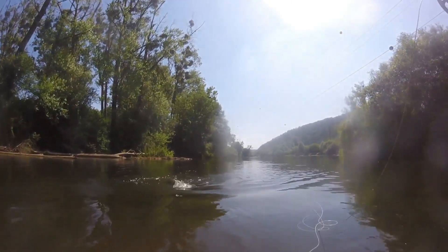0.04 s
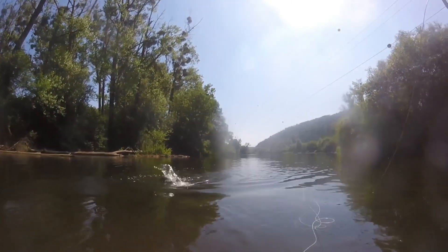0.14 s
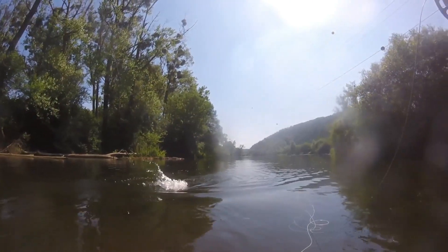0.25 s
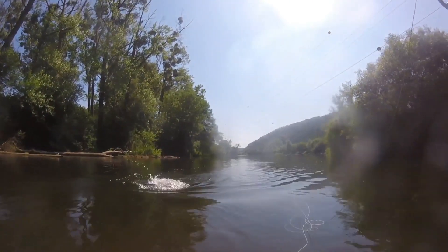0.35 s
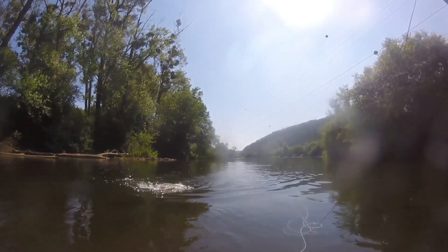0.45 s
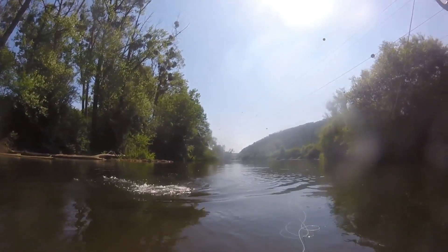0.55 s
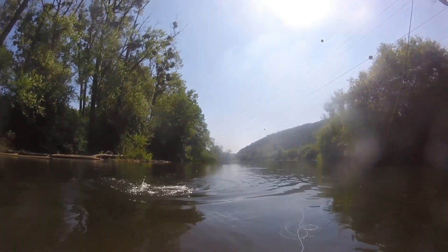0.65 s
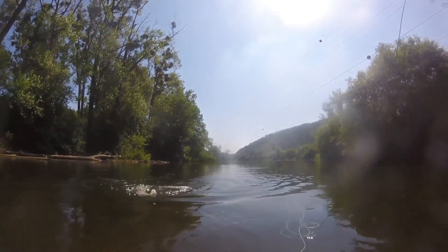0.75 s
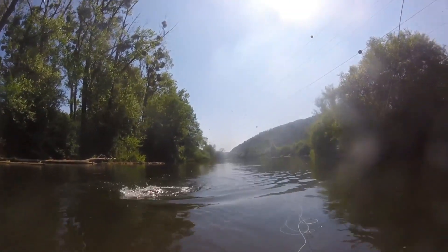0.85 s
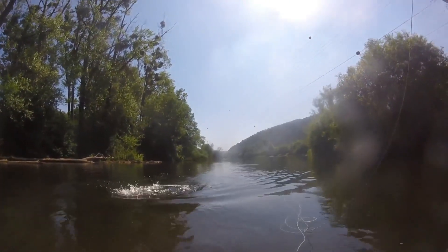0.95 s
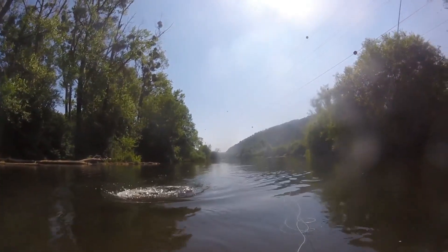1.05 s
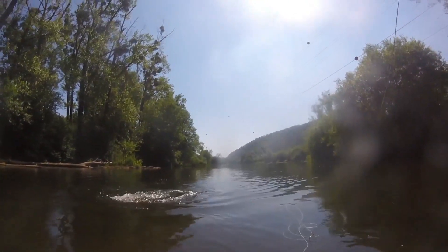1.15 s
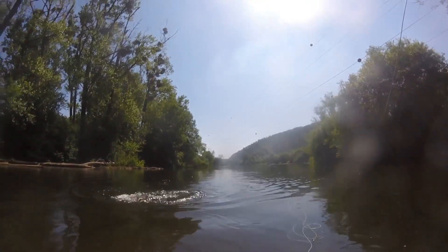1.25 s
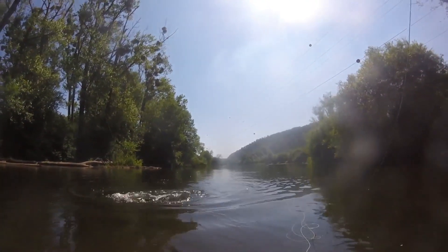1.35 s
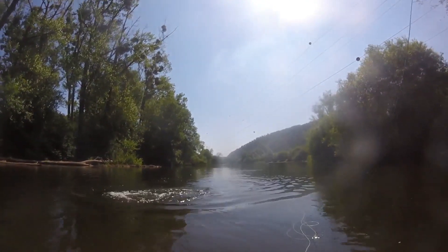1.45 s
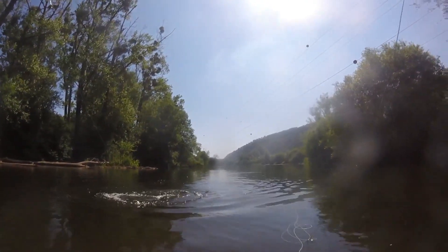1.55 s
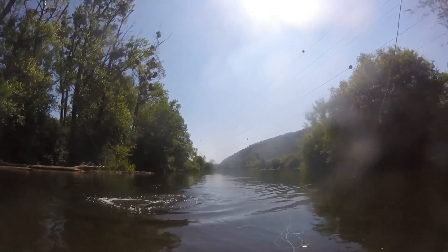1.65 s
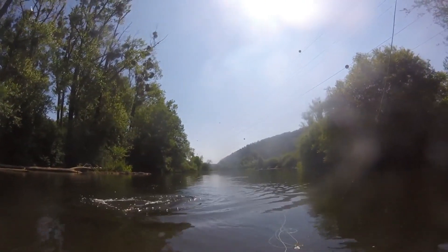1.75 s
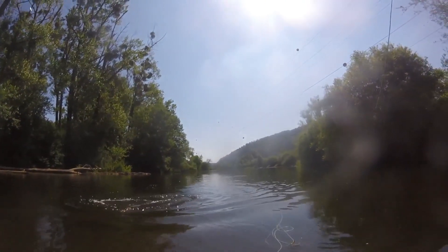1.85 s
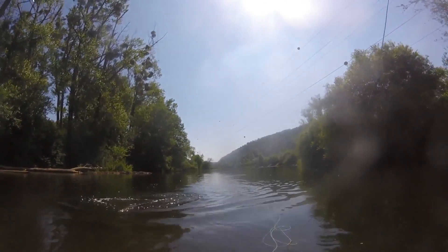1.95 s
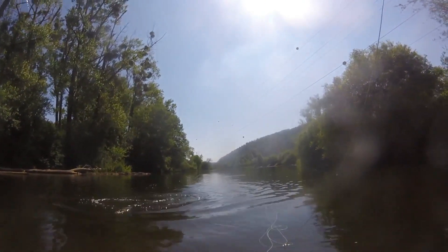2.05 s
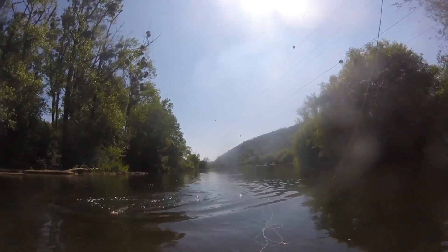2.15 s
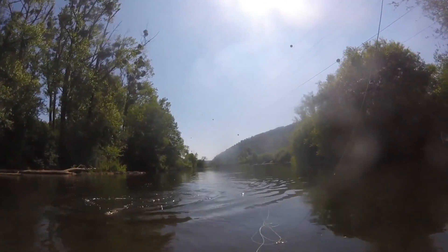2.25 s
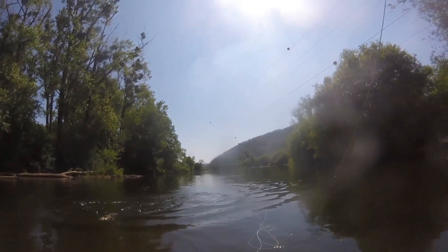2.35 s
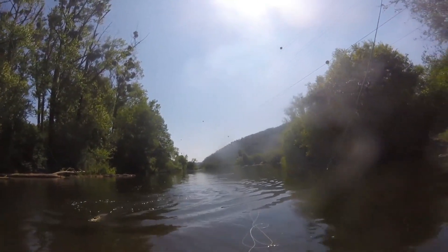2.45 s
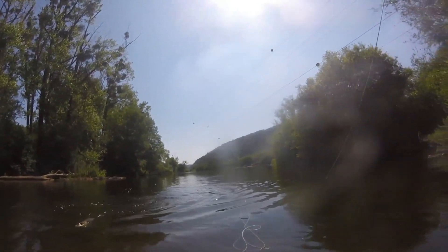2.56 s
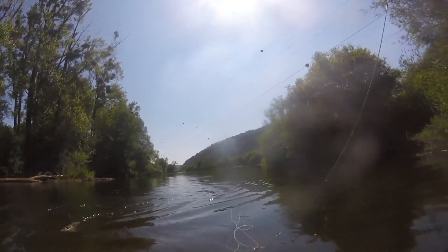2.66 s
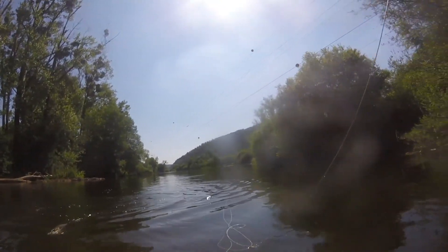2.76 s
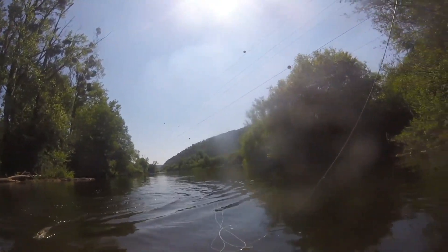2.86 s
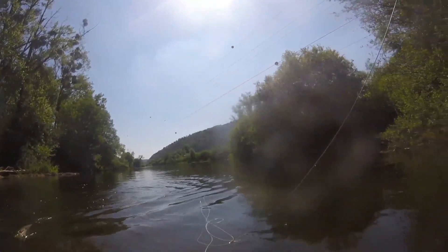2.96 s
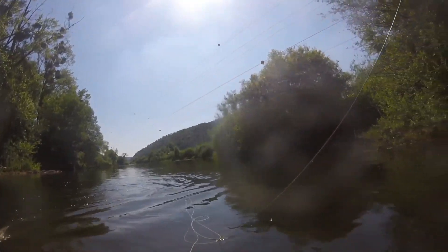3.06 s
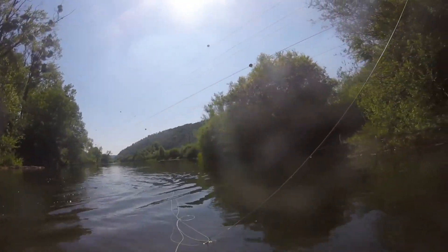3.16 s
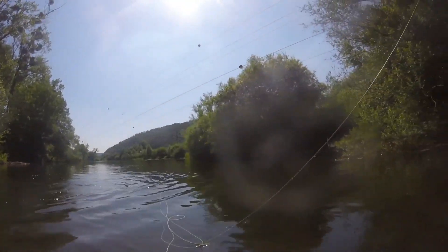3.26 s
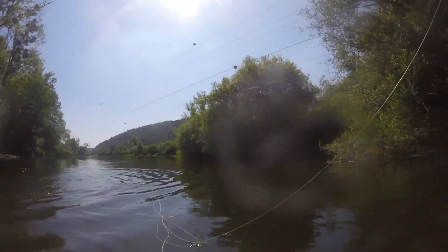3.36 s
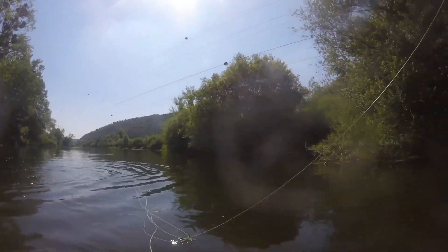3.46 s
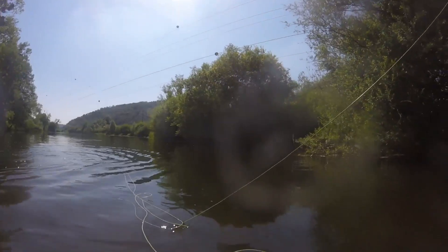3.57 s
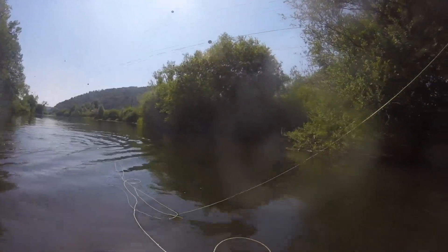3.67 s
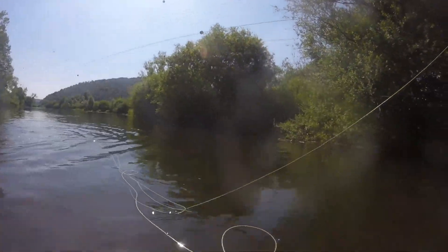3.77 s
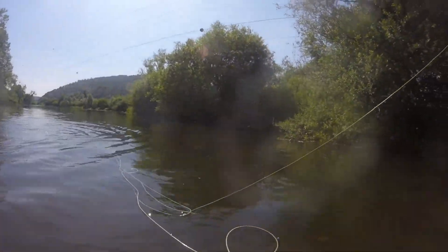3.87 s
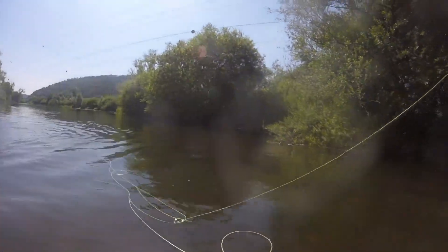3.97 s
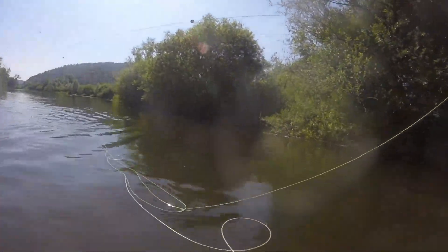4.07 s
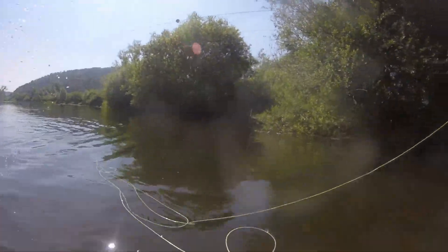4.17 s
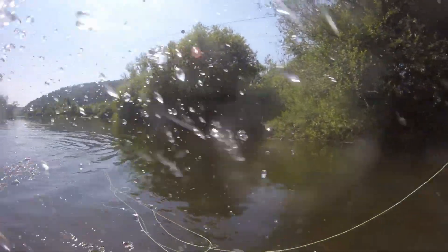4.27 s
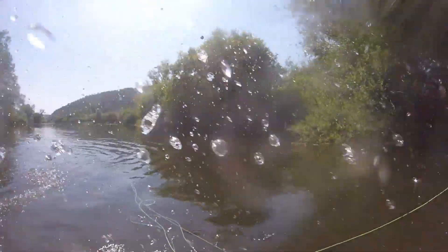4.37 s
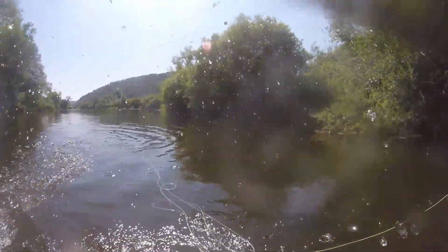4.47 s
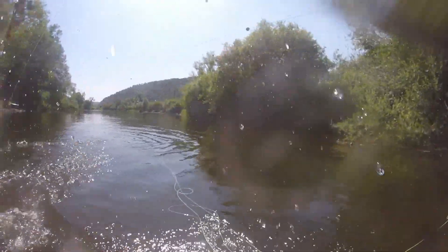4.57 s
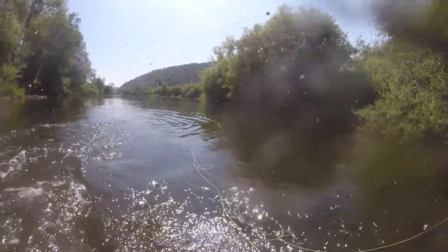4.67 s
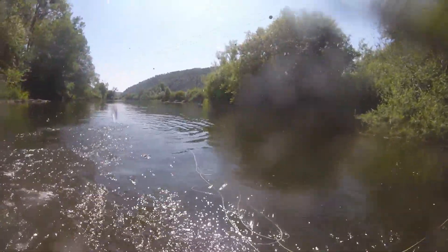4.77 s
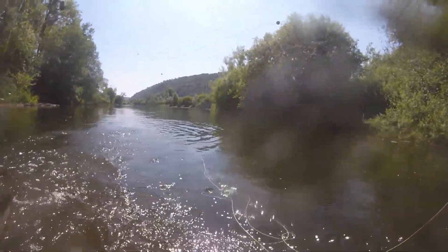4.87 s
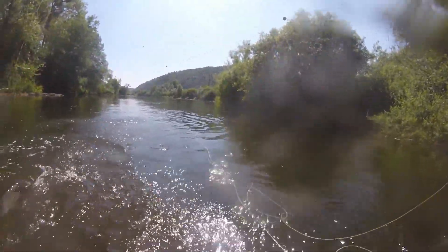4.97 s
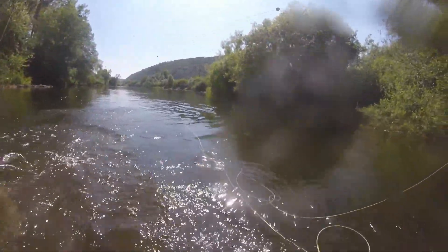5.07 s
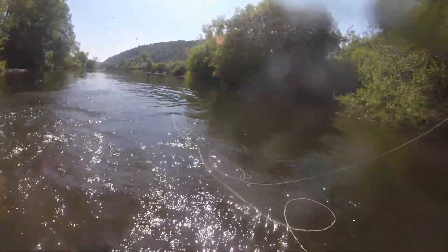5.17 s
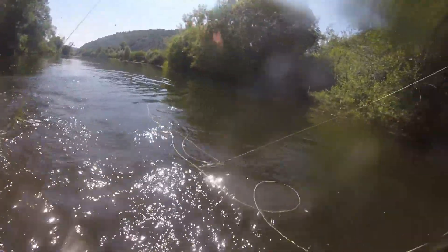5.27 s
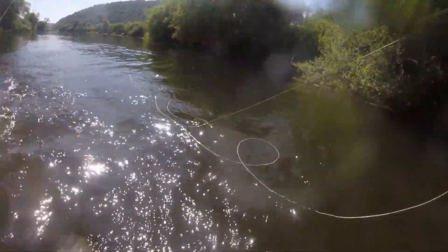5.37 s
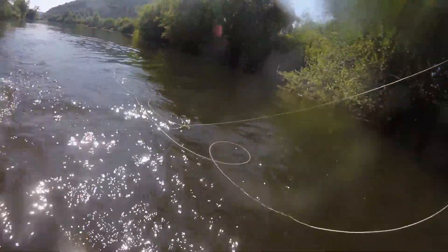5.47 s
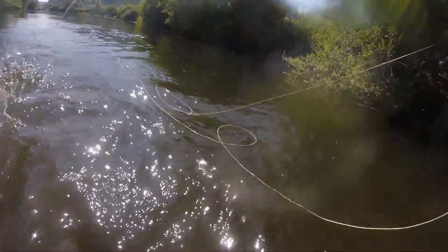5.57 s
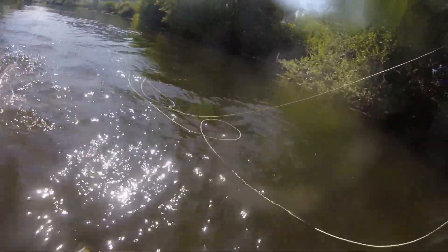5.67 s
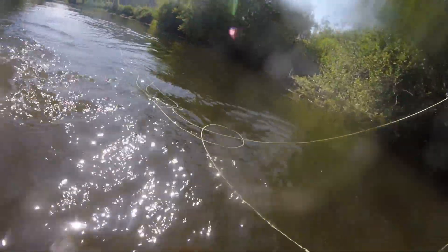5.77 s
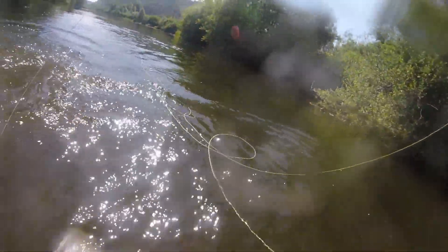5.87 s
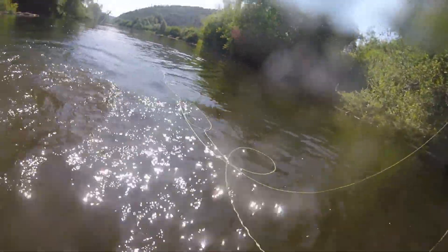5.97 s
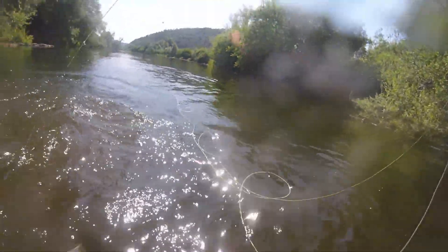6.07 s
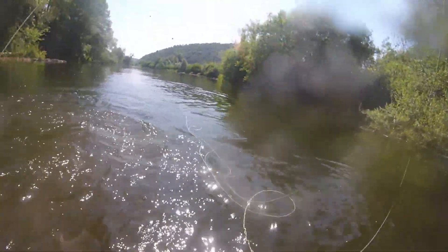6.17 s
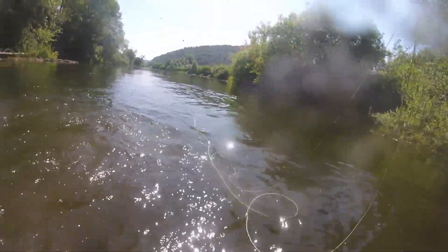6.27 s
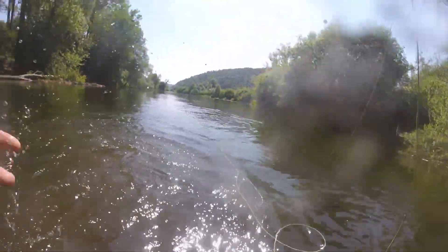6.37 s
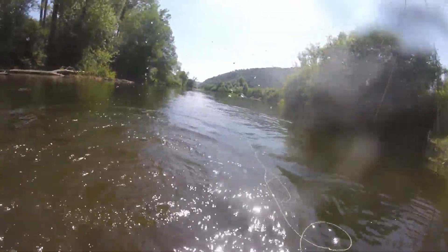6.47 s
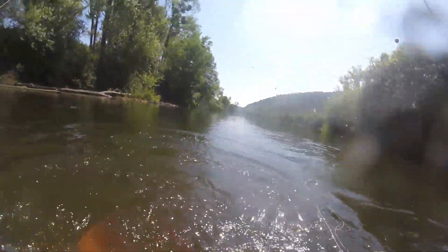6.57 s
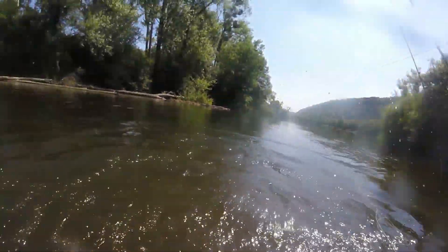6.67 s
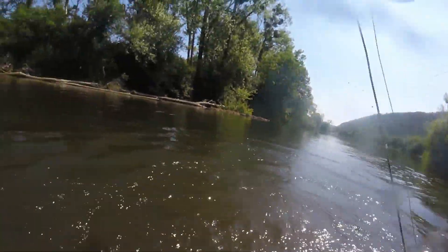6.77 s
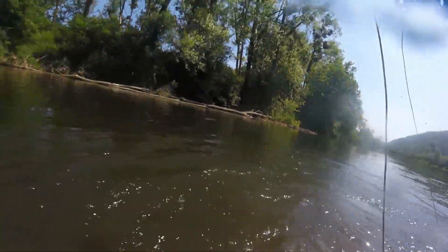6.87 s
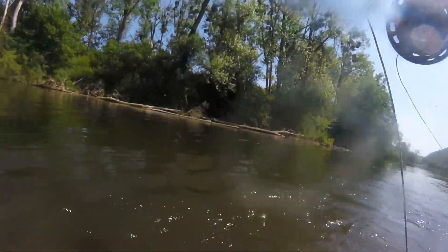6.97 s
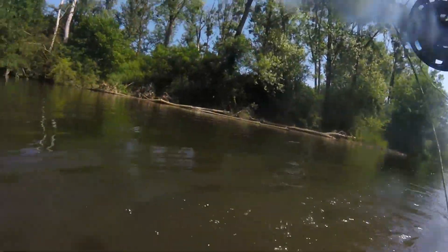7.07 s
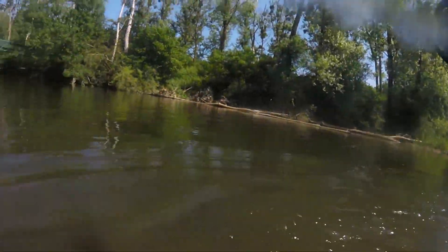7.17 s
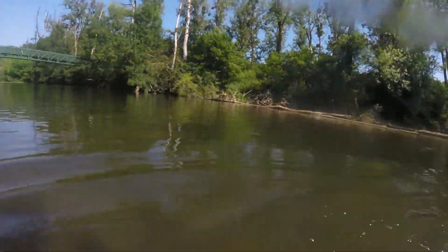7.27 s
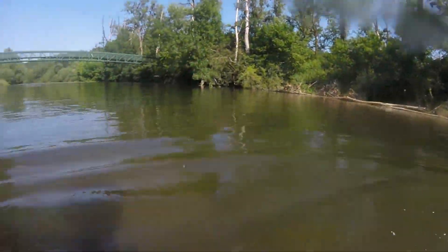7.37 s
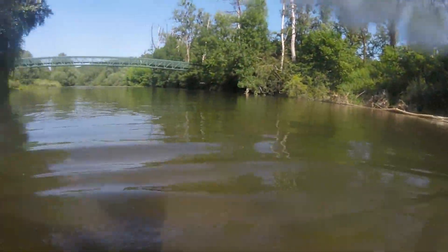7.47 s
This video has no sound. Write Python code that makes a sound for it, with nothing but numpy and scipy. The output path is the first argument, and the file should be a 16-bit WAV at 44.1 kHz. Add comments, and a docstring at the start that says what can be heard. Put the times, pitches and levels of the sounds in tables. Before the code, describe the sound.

A microphone in a waterproof case, worn by an angler standing in a gentle river, picks up two far-off bouts of fish splashing and a faint bird trill. Cloth rustles, a fishing line hisses briefly across the surface, and water smacks the case with a sharp crack and a slight ring. Falling drops give way to wading, with bubbling drips, rubbing waders and a rumbling, knocking harness.

```python
"""A fish thrashes twice far out in a slow river, heard from a body-worn camera in a waterproof case.
A songbird whistles and trills; sleeves rub as the angler pulls in line. The taut line hisses through
the water, a close splash strikes the case and rings its mount, and drops patter back. The angler wades
and turns: waders rub, bubbles gurgle and plink, the harness rumbles and knocks."""
import sys
import numpy as np
from scipy import signal
from scipy.fft import rfft, irfft
from scipy.io import wavfile
from scipy.ndimage import uniform_filter1d

SR = 44100
rng = np.random.default_rng(int(sys.argv[2]) if len(sys.argv) > 2 else 0)


def put_to_file(sound):
    """Save the sound as 16-bit audio at rate SR, in the file named by the first command-line argument."""
    columns = np.atleast_2d(sound).T  # one column per channel
    safe = np.clip(columns, -1, 1)
    whole_steps = np.round(safe * 32767)
    wavfile.write(sys.argv[1], SR, whole_steps.astype(np.int16))


N = 331499
T = np.arange(N) / SR
HZ = np.fft.rfftfreq(N, 1 / SR)

# spectra: freq_hz, relative_db
RIVER_SPECTRUM = [(12, -21.5), (20, -10), (29, -4.5), (43, -6.5), (74, -18.5), (178, -19), (325, -25),
                  (739, -29.5), (847, -32.5), (972, -32), (2670, -39), (3240, -40), (5010, -44.5),
                  (13800, -61.5)]  # current and air
SWAY_SPECTRUM = [(4, -34.5), (9, 13), (16, -1.5), (24, -3), (35, -13.5), (55, -28), (90, -36), (200, -97)]  # chest
RUMBLE_SPECTRUM = [(30, -29), (55, 4.5), (90, 2), (120, -2.5), (165, -3.5), (230, -17.5), (400, -16.5),
                   (800, -66)]  # harness
THRASH_SPECTRUM = [(300, 6), (600, 2.5), (830, 6), (1250, -5.5), (1800, -1), (2450, 7.5), (2950, -5.5),
                   (3900, -0.5), (4500, -12), (7000, -19), (12000, -45)]  # far spray
CRACK_SPECTRUM = [(150, -4), (550, 1), (1200, -3), (3500, -1.5), (7000, -15), (9500, -27.5), (13000, -33.5)]  # impact noise
RUB_SPECTRUM = [(100, -22), (250, -4), (500, 3), (900, -1.5), (1450, -8), (2000, -5.5), (2450, -11.5),
                (2800, -27), (3800, -25.5), (4600, -56), (7000, -36), (9000, -45), (13000, -62)]  # sleeves, waders
LINE_SPECTRUM = [(200, -3), (700, 6.5), (1100, 3), (2300, -1.5), (2800, -10), (3800, -13), (4600, -16),
                 (7000, -18.5), (8200, -25.5), (9000, -30), (13000, -44)]  # line cutting water
SPRAY_SPECTRUM = [(50, -4), (140, 7.5), (220, -4), (320, 1.5), (400, -1.5), (620, 6), (1000, -5),
                  (2400, -6.5), (3600, -16.5), (5000, -20), (7500, -25.5), (9000, -34), (13000, -37.5)]  # close splash
TICK_SPECTRUM = [(500, 9), (1200, -6), (2400, 10.5), (3800, 4), (7200, 0.5), (8500, -28), (13000, -32)]  # landing drops
# air and wall resonances of the case: centre_hz, width_hz, lift_db
CASE_MODES = [(461, 160, 4.5), (786, 20, 10), (1310, 48, 3.5), (1500, 280, -4), (2330, 290, 10.5),
              (3500, 540, 13.5), (6850, 1400, 11.5)]
# mount resonances: pitch_hz, relative_db, t60_s
MOUNT_MODES = [(534, -10.5, 0.98), (700, -12, 0.83), (1280, 0.5, 0.7), (1350, -3.5, 0.57), (2230, -11, 1)]
# how hard the angler moves: time_s, level_db
EFFORT_CURVE = [(0, -61), (2.65, -63), (3.9, -53), (4.7, -50.5), (5.35, -47), (5.8, -48.5), (6.95, -48),
                (7.23, -60), (7.5, -43)]
# steps and turns swinging the chest: peak_s, level_db
CHEST_SWINGS = [(3.69, -37.5), (3.99, -29.5), (4.231, -18.5), (4.77, -13.5), (5.049, -18.5), (5.58, -16),
                (5.8, -14.5), (6.041, -16.5), (6.45, -30), (7.102, -22), (7.4, -28)]
# impacts: start_s, level_db, pitch_hz, decay_s, crack_vs_tone_db
HARNESS_KNOCKS = [(4.467, -32, 185, 0.0075, -23), (4.876, -21.5, 131, 0.0069, -45),
                  (4.972, -25.5, 115, 0.012, -41), (4.994, -23.5, 326, 0.0048, -40),
                  (5.032, -24.5, 94, 0.019, -44), (5.093, -22, 127, 0.0044, -41),
                  (5.255, -40, 119, 0.01, -35), (5.554, -23.5, 318, 0.0025, -37),
                  (5.558, -36, 752, 0.015, -27), (6.244, -47, 160, 0.017, -10),
                  (6.476, -34, 312, 0.0054, -36), (6.583, -25, 133, 0.0059, -38),
                  (6.585, -26, 340, 0.0081, -25), (6.588, -30, 600, 0.0098, -38)]  # dull knocks, gulps of water
TAIL_SLAPS = [(.099, -48, 2520, 0.0027, 7), (.284, -39, 780, 0.0081, -15), (.837, -38, 2540, 0.0061, -10)]
CASE_BLOWS = [(4.049, -37.5, 2180, 0.0058, -17.5), (4.3213, -17, 630, 0.0019, -3),
              (4.3275, -24, 700, .0017, 1), (4.3325, -12.5, 150, 0.0025, -19),
              (4.334, -14.5, 327, .006, -20), (4.3347, -10.5, 3500, 0.0019, 1),
              (4.346, -11, 3500, 0.0017, -14), (4.3549, -21, 2020, 0.0017, 4),
              (4.362, -19.5, 3500, .003, -2.5), (4.3717, -17.5, 3420, .002, -4),
              (4.3745, 1, 1374, 0.0037, -6.5), (4.3829, -9, 2360, 0.0041, -8),
              (4.3961, -13.5, 2567, 0.0017, -2.5), (4.407, -22, 3305, .0035, -3),
              (4.5098, -37, 1310, 0.0024, 0.5), (4.544, -36.5, 3420, 0.0034, -6),
              (4.798, -30.5, 1420, 0.0043, -5), (6.5606, -32, 3460, 0.0036, -1.5),
              (6.572, -29.5, 1250, 0.0042, 1), (6.579, -26, 3380, 0.0022, -11),
              (6.593, -42, 3520, .0048, -25), (6.6262, -45, 3620, .002, -12)]  # water, tackle
# thrown water: peak_s, level_db, rise_s, fade_s
FAR_BURSTS = [(.1, -51, 0.012, 0.13), (.18, -52.5, 0.014, 0.19), (.29, -51, 0.067, 0.047),
              (.502, -52, 0.064, 0.052), (.845, -44, 0.024, 0.061), (.97, -50.5, 0.12, 0.15),
              (1.19, -55.5, .02, 0.029)]
CLOSE_SHEETS = [(4.336, -11, .005, 0.0047), (4.358, -17, .021, 0.033), (4.383, -13.5, .004, 0.0039),
                (4.45, -47, .05, 0.42)]  # the last runs off the case
# larger drips and bubbles in the river: start_s, level_db, pitch_hz
RIVER_DRIPS = [(0.404, -41.5, 2490), (5.287, -41.5, 1210), (5.378, -45, 1660), (5.433, -45, 4500),
               (5.463, -43.5, 5450), (5.538, -35.5, 3210), (5.679, -40.5, 2380), (5.847, -34.5, 2210),
               (6.031, -39.5, 1670), (6.104, -38, 1670), (6.13, -43, 1190), (6.191, -42, 2270),
               (6.224, -41.5, 2250), (6.302, -39, 1750), (6.326, -40.5, 2230), (6.349, -40.5, 3500),
               (6.685, -47, 4900), (6.725, -39.5, 750), (7.045, -48, 3550)]
# songbird whistles: start_s, length_s, start_hz, end_hz, level_db, rasp_hz
BIRD_NOTES = [(1.538, 0.068, 3700, 3460, -57.5, 70), (1.648, 0.094, 3750, 3640, -60, 110),
              (1.737, 0.13, 3780, 3720, -62, 220), (1.85, 0.063, 3870, 3480, -56.5, 80),
              (2.06, .083, 2550, 2450, -62.5, 30), (2.597, .074, 4020, 3480, -60.5, 130),
              (2.738, 0.075, 3100, 3710, -56, 262), (2.823, 0.11, 3890, 3500, -63.5, 140),
              (2.9, 0.041, 4000, 3070, -55, 120), (2.933, 0.049, 3600, 3100, -62, 200),
              (3.322, 0.021, 3080, 3720, -56, 120), (3.402, 0.024, 4600, 3140, -58, 150)]
# limb moves: start_s, length_s, level_db
ARM_PULLS = [(2.83, 0.27, -51.5), (3.13, 0.29, -49.5), (3.48, .19, -49), (3.67, 0.12, -52),
             (3.79, .16, -51), (3.92, 0.15, -57.5)]
LEG_MOVES = [(4.82, 0.14, -65), (5.04, 0.069, -55), (5.18, 0.19, -52), (5.37, 0.25, -52.5),
             (5.55, .17, -49), (5.72, 0.26, -50.5), (5.9, 0.92, -55), (6.59, 0.11, -50.5), (6.7, .2, -52),
             (6.92, .19, -54), (7.24, 0.46, -63)]
# heaviest drops landing on the case: start_s, level_db
HEAVY_DROPS = [(4.424, -24), (4.593, -33.5), (4.62, -37), (4.693, -35.5), (4.762, -36), (4.828, -40),
               (4.882, -37), (4.959, -38.5)]

PULL_SKEW, WADE_SKEW = 1.35, 0.66  # a pull peaks late, a leg early


def amp(db):
    """Decibels to gain."""
    return 10 ** (np.asarray(db) / 20)


def unit(x):
    """Scale to rms 1."""
    return x / np.sqrt(np.mean(x ** 2) + 1e-20)


def colour(x, spectrum, modes=()):
    """Filter by a smooth spectrum plus resonances; rms 1."""
    hz, db = np.transpose(spectrum)
    shape_db = np.interp(np.log(HZ + 1), np.log(hz + 1), db)
    for centre_hz, width_hz, lift_db in modes:
        shape_db += lift_db / (1 + (2 * (HZ - centre_hz) / width_hz) ** 2)
    return unit(irfft(rfft(x) * amp(shape_db), N))


def drift(rate_hz):
    """Random wander up to about rate_hz; rms 1."""
    return unit(irfft(rfft(rng.standard_normal(N)) * np.exp(-(HZ / rate_hz) ** 2), N))


def grains(per_s, spread_db):
    """Random clicks of uneven size; rms 1."""
    size = amp(spread_db * np.minimum(rng.exponential(1, N), 4))
    return unit(size * rng.choice([-1, 1], N) * (rng.random(N) < per_s / SR))


def add(mix, start_s, sound):
    """Mix a sound in at start_s."""
    part = mix[max(round(start_s * SR), 0):][:len(sound)]
    part += sound[:len(part)]


def bursts(rows):
    """Envelope of thrown water: exponential rise and fade; powers add."""
    power = np.zeros(N)
    for peak_s, db, rise_s, fade_s in rows:
        log_gain = np.minimum((T - peak_s) / rise_s, (peak_s - T) / fade_s)
        power += (amp(db) * np.exp(np.maximum(log_gain, -20))) ** 2
    return np.sqrt(power)


def strokes(rows, skew):
    """Envelope of limb moves: each speeds up and slows in one arch; powers add."""
    power = np.zeros(N)
    for start_s, length_s, db in rows:
        progress = np.clip((T - start_s) / length_s, 0, 1)
        power += amp(db) ** 2 * abs(np.sin(np.pi * progress ** skew)) ** 1.15
    return np.sqrt(power)


def strikes(rows, attack_cycles):
    """Impacts: a damped tone and a noise crack under one envelope."""
    out, t = np.zeros(N), T[:SR // 10]
    noise = colour(rng.standard_normal(N), CRACK_SPECTRUM)
    for start_s, db, hz, decay_s, crack_db in rows:
        envelope = np.tanh(t * hz / attack_cycles) * (1 + t / decay_s) * np.exp(-1.6 * t / decay_s)
        crack = amp(crack_db) * noise[round(start_s * SR):][:len(t)]
        add(out, start_s, amp(db) * envelope * (np.sin(2 * np.pi * hz * t) + crack))
    return out


def bubble(hz, decay_cycles, glide):
    """Trapped air rings down, its pitch climbing as it nears the surface."""
    age = np.arange(int(6 * decay_cycles / hz * SR)) / SR * hz / decay_cycles  # in decay times
    tone = np.sin(2 * np.pi * decay_cycles * (age + glide * age ** 2 / 2))
    return tone * np.exp(-age) * (1 - np.exp(-age * decay_cycles))


def bubbles(low_hz, high_hz, per_s, decay_cycles, spread_db, sizes=24):
    """Bubble cloud: each click rings one bubble size."""
    clicks, size_index = grains(per_s, spread_db), rng.integers(0, sizes, N)
    cloud = np.zeros(N)
    for k, hz in enumerate(np.geomspace(low_hz, high_hz, sizes)):
        ring = unit(bubble(hz, decay_cycles, glide=0.027)) * np.sqrt(hz)
        cloud += signal.oaconvolve(clicks * (size_index == k), ring)[:N]
    return unit(cloud)


def bank_echo(x, t60_s, wet_db):
    """Add diffuse echo from the trees on the banks."""
    tail = rng.standard_normal(SR) * amp(-60 * T[:SR] / t60_s)
    return x + amp(wet_db) * signal.fftconvolve(x, tail / np.linalg.norm(tail))[:N]


def river(level_db=-50):
    """Soft, wavering wash of the current."""
    return colour(rng.standard_normal(N), RIVER_SPECTRUM) * amp(level_db + 1.7 * drift(12))


def camera_whine(pitch_hz=9640, jitter_hz=14, rms_db=-81.5):
    """Thin electronic tone."""
    hz = pitch_hz + jitter_hz * drift(150)
    return amp(rms_db) * np.sqrt(2) * np.sin(2 * np.pi * np.cumsum(hz) / SR)


def body(rest_sway_db=-46, rest_effort_db=-60.5, sway_db_per_db=1.72):
    """Chest sway and harness rumble follow effort; steps add sway; knocks come through the mount."""
    effort_db = np.interp(T, *np.transpose(EFFORT_CURVE))
    swing = amp(rest_sway_db + sway_db_per_db * (effort_db - rest_effort_db))
    swing += sum(amp(db) * np.exp(-((T - peak_s) / 0.071) ** 2) for peak_s, db in CHEST_SWINGS)
    sway = colour(rng.standard_normal(N), SWAY_SPECTRUM)
    sway /= np.sqrt(uniform_filter1d(sway ** 2, size=SR // 6))  # even out the level
    rumble = colour(rng.standard_normal(N), RUMBLE_SPECTRUM) * amp(effort_db + 4.5)
    return sway * swing + rumble + strikes(HARNESS_KNOCKS, attack_cycles=0.081)


def far_fish():
    """Distant tail slaps with spray and bubbles."""
    spray = grains(per_s=3500, spread_db=3)
    froth = bubbles(606, 4970, per_s=1500, decay_cycles=5.5, spread_db=4)
    slosh = colour((spray + 0.31 * froth) * amp(1.2 * drift(60)), THRASH_SPECTRUM)
    slaps = strikes(TAIL_SLAPS, attack_cycles=1.1)
    return slosh * bursts(FAR_BURSTS) + bank_echo(slaps, t60_s=0.13, wet_db=-5)


def drips():
    """Single plinks on the river: a small splat, a ringing bubble, a short wash."""
    splats = [(start_s, db - 12, hz, 0.002, 2) for start_s, db, hz in RIVER_DRIPS]
    out = strikes(splats, attack_cycles=1.06)
    for start_s, db, hz in RIVER_DRIPS:
        add(out, start_s, amp(db) * bubble(hz, decay_cycles=7, glide=0.03))
    return bank_echo(out, t60_s=0.05, wet_db=-3)


def bird(trill_start_s=1.962, period_s=0.0735, chips=10):
    """Songbird in the trees: raspy whistles around a trill of falling chips, loudest midway."""
    chip_s, top_hz, bottom_hz, chip_rasp_hz = 0.022, 4500, 2950, 70
    trill = []
    for k in range(chips):
        db = -54 - 0.1 * (k - chips / 2) ** 2
        trill.append((trill_start_s + k * period_s, chip_s, top_hz, bottom_hz, db, chip_rasp_hz))
    song, rasp = np.zeros(N), drift(600)
    for start_s, length_s, start_hz, end_hz, db, rasp_hz in BIRD_NOTES + trill:
        progress = np.linspace(0, 1, int(length_s * SR))
        hz = end_hz + (start_hz - end_hz) * (1 - progress) ** 2.2
        hz += rasp_hz * rasp[round(start_s * SR):][:len(hz)]
        whistle = np.sin(2 * np.pi * np.cumsum(hz) / SR)
        add(song, start_s, amp(db) * np.sin(np.pi * progress) * whistle)
    return bank_echo(song, t60_s=0.8, wet_db=-7.5)


def sleeves():
    """Cloth slips in tiny jerks on each pull; the case colours the friction."""
    slips = grains(per_s=7000, spread_db=2.2) * amp(0.89 * drift(31))
    return colour(slips, RUB_SPECTRUM, CASE_MODES) * strokes(ARM_PULLS, PULL_SKEW)


def line(start_s=4.042, length_s=0.3, level_db=-44.5, attack_s=0.008, release_s=0.03, jerk_s=0.025):
    """Taut line cuts the surface: a jerk, then a fluttering hiss."""
    t = np.maximum(T - start_s, 0)
    gate = np.clip(np.minimum(t / attack_s, (length_s - t) / release_s), 0, 1)
    jerk = 1 + 0.9 * np.exp(-t / jerk_s)
    tearing = grains(per_s=3500, spread_db=4.6) * amp(2 * drift(86))
    return colour(tearing, LINE_SPECTRUM, CASE_MODES) * amp(level_db) * gate * jerk


def close_splash(ring_vs_blow_db=-36.5):
    """Water and tackle hit the case; the hardest blow rings its mount."""
    spatter = grains(per_s=3600, spread_db=2.3)
    wet_modes = [(hz, width_hz, db / 2) for hz, width_hz, db in CASE_MODES]  # water damps the walls
    sheets = colour(spatter, SPRAY_SPECTRUM, wet_modes) * bursts(CLOSE_SHEETS)
    out, t = sheets + strikes(CASE_BLOWS, attack_cycles=1), T[:SR]
    blow_s, blow_db, *_ = max(CASE_BLOWS, key=lambda blow: blow[1])
    ring = sum(amp(db - 60 * t / t60_s) * np.sin(2 * np.pi * hz * t) for hz, db, t60_s in MOUNT_MODES)
    add(out, blow_s, amp(blow_db + ring_vs_blow_db) * ring)
    return out


def patter(peak_s=4.61, rise_s=0.07, fade_s=0.25):
    """Drops fall after the splash and off the legs: fine splats, plinks, a few heavy ticks."""
    t = T[:SR // 50]
    splat = rng.standard_normal(len(t)) * np.exp(-t / 0.001)
    splats = colour(signal.oaconvolve(grains(per_s=130, spread_db=4), splat)[:N], TICK_SPECTRUM)
    plinks = bubbles(2000, 7000, per_s=110, decay_cycles=4, spread_db=3.5)
    shower = bursts([(peak_s, -56.5, rise_s, fade_s)])
    off_legs = amp(-14) * strokes(LEG_MOVES, WADE_SKEW)
    tick_envelope = np.zeros(N)
    for start_s, db in HEAVY_DROPS:
        add(tick_envelope, start_s, amp(db) * np.exp(-t / 0.002))
    ticks = colour(rng.standard_normal(N), TICK_SPECTRUM) * tick_envelope
    return (amp(-6) * splats + amp(-8.5) * plinks) * (shower + off_legs) + amp(-6.5) * ticks


def wading():
    """Each leg move rubs the waders and stirs up gurgles."""
    slips = grains(per_s=4000, spread_db=2.8) * amp(1.5 * drift(45))
    rub = colour(slips, RUB_SPECTRUM, CASE_MODES)
    gurgles = bubbles(350, 2800, per_s=200, decay_cycles=7, spread_db=3.5)
    return (rub + amp(-5.5) * gurgles) * strokes(LEG_MOVES, WADE_SKEW)


def scene():
    """All sources at one microphone."""
    bed = river() + camera_whine() + body()
    far = far_fish() + drips() + bird()
    near = sleeves() + line() + close_splash() + patter() + wading()
    return (bed + far + near)[None]


def record(dry):
    """Soft overload on the loudest peaks, then a low-pass."""
    ceiling, cutoff_hz = 0.95, 13900
    limited = dry / (1 + (dry / ceiling) ** 6) ** (1 / 6)
    lowpass = signal.firwin(255, cutoff_hz, window=("kaiser", 9), fs=SR)
    return signal.oaconvolve(limited, lowpass[None], "same")


dry = scene()
out = record(dry)
put_to_file(out)
```